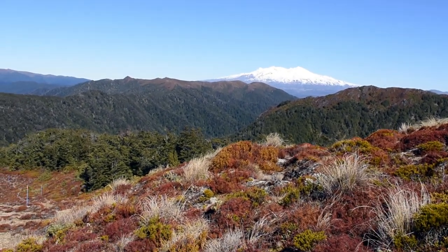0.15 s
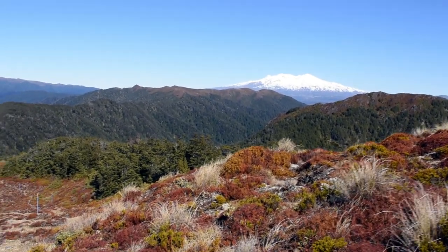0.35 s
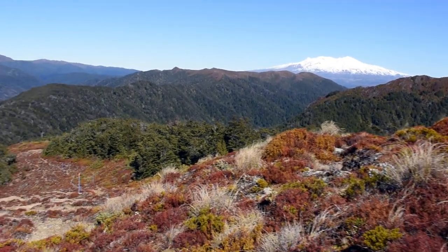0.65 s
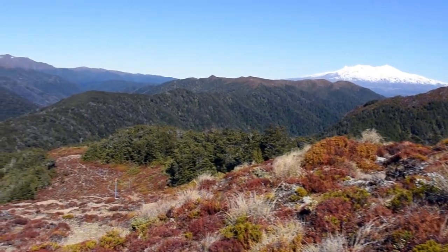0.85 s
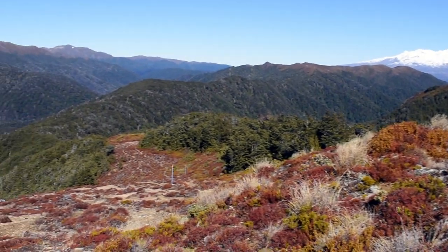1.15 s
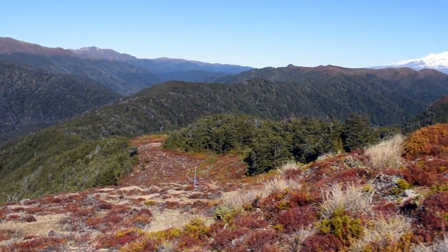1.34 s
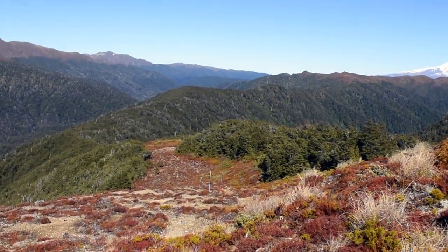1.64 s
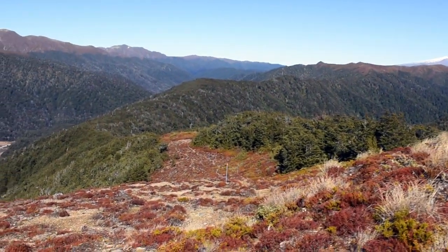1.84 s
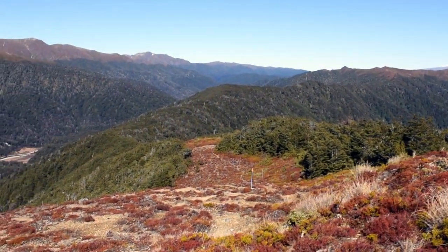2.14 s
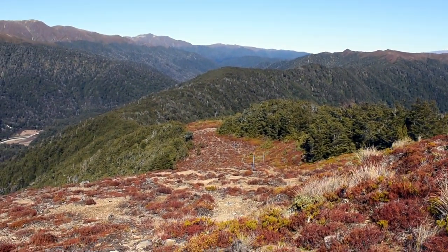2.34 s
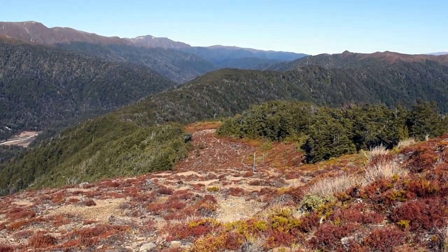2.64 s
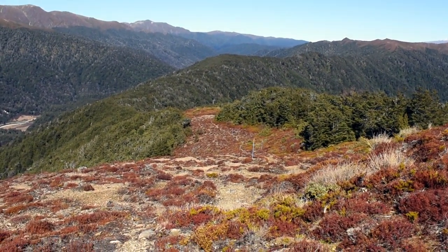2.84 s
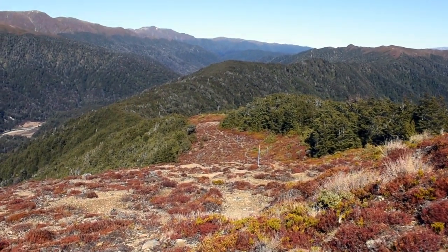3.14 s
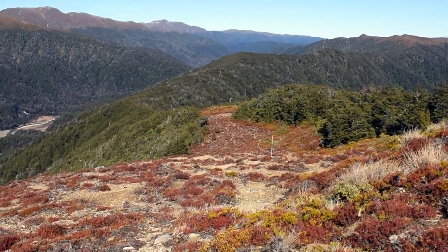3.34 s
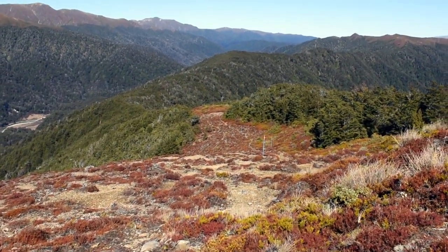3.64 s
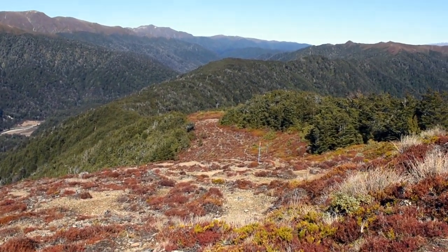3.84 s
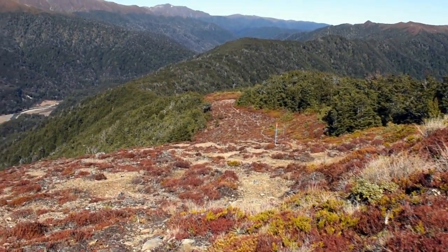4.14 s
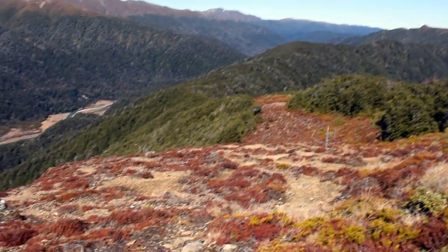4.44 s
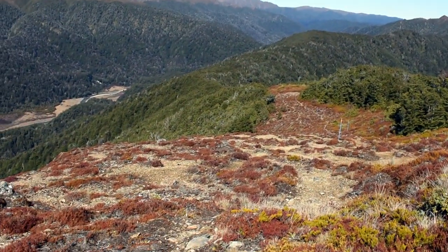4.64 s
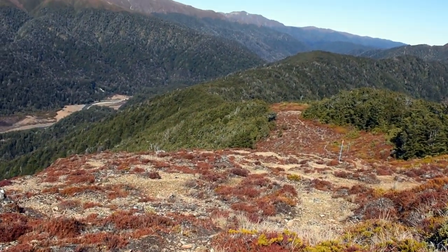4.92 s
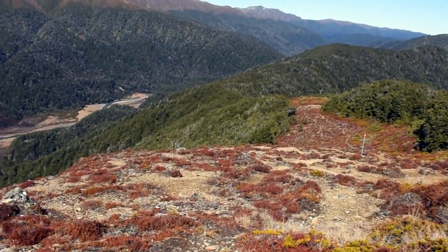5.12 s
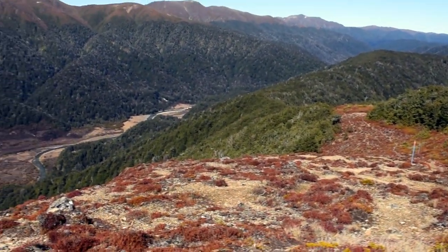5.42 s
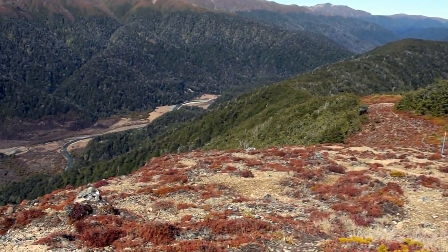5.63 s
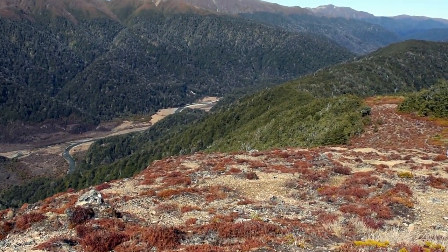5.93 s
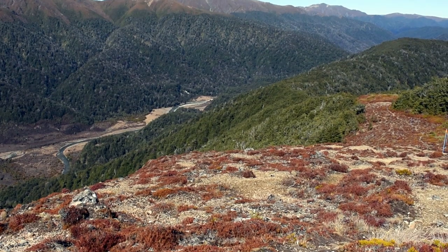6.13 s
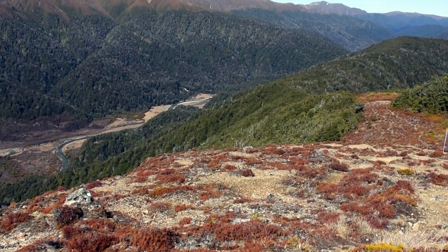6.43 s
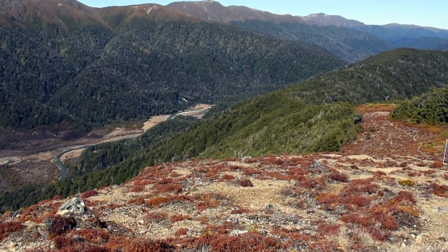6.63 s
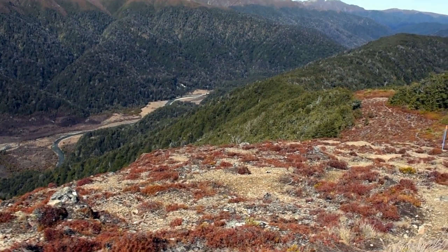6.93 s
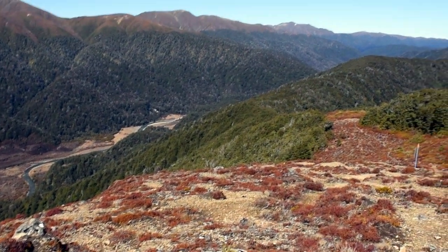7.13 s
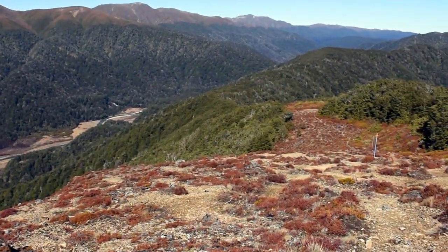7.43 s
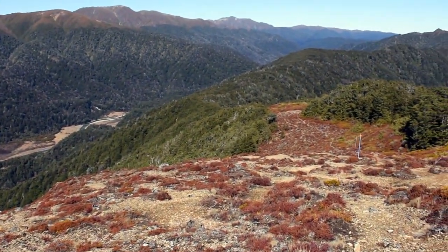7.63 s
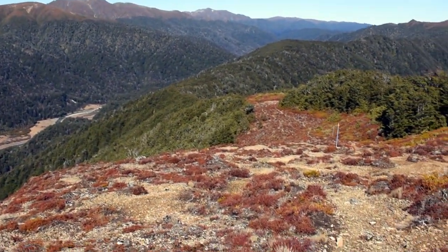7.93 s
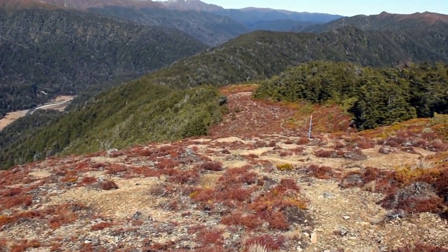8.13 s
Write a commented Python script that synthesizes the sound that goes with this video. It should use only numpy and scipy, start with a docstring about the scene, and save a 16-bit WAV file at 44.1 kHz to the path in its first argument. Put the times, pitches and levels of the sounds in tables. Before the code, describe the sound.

Close footsteps crunch over gravel at a walking pace, a little uneven, with small stones clicking and grit trickling between treads. The place is outdoors and dry in sound, with only a faint rush of open air behind. Light wind rumbles on the microphone now and then. Toward the end a boot scrapes a stone, and the wind buffets the microphone with a burst of low thumps.

```python
"""Boots crunch along a gravel track below a hand-held camera. Under each tread the bed gives, stones knock and
grit fizzes: dense damped sines plus noise, swelling with the load. Pebbles clack sharply, crowded within the
treads and scattered between them, and one flat stone rings as it is scraped. Wind buffets and thumps on the
microphone over a faint rush of open air; no walls."""
import sys
import numpy as np
from scipy import signal
from scipy.fft import rfft, irfft, next_fast_len
from scipy.io import wavfile
from scipy.ndimage import uniform_filter1d, map_coordinates

SR = 44100
rng = np.random.default_rng(int(sys.argv[2]) if len(sys.argv) > 2 else 0)


def store_wav(level_fs):
    """Save 16-bit WAV to argv[1]."""
    pcm = np.round(np.clip(np.atleast_2d(level_fs), -1, 1) * 32767)
    wavfile.write(sys.argv[1], SR, pcm.T.astype(np.int16))


N = 364707
CONTROL_S = .001  # time step of the level curves
LAND_S = .01  # onset of a boot's load


def amp(db):
    return 10 ** (np.asarray(db) / 20)


def unit_rms(x):
    return x / np.sqrt(np.mean(x ** 2) + 1e-20)


def sample_db(power):
    """Power given every CONTROL_S to dB at every sample."""
    return np.interp(np.arange(N) / SR, np.arange(len(power)) * CONTROL_S, 10 * np.log10(power))


def wobble(rate_hz):
    """Smooth random curve, rate_hz knots a second."""
    knots = rng.standard_normal(int(N * rate_hz / SR) + 4)
    return map_coordinates(knots, [np.arange(N) * rate_hz / SR])


def coloured(x, points):
    """Minimum-phase filter through (Hz, dB) points."""
    size = 8192
    hz, db = np.transpose(points)
    gain_db = np.interp(np.log(np.fft.rfftfreq(size, 1 / SR) + 1), np.log(hz), db)
    cepstrum = irfft(np.log(amp(gain_db)), size)
    cepstrum[1:size // 2] *= 2
    cepstrum[size // 2 + 1:] = 0
    impulse = irfft(np.exp(rfft(cepstrum)), size)[:size // 2]
    return signal.oaconvolve(x, impulse)[:N]


def place(starts_s, sounds):
    """Sum short sounds, one a row, at their starts."""
    at = np.clip(np.round(starts_s * SR).astype(int), 0, N)[:, None] + np.arange(sounds.shape[1])
    return np.bincount(at.ravel(), sounds.ravel(), N + sounds.shape[1])[:N]


def grains(count, hz, octaves, decay_cycles, cap_db, samples, spread_db=2.5):
    """Random damped sines within +-octaves of hz, a few louder than the rest."""
    when, pitch, luck, sign = rng.random((count, 4)).T
    cycles = (hz * 2 ** (octaves * (2 * pitch - 1)))[:, None] * np.arange(samples) / SR
    strength = amp(np.minimum(-spread_db * np.log(1 - luck), cap_db)) * np.sign(sign - .5)
    rings = strength[:, None] * np.exp(-cycles / decay_cycles) * np.sin(2 * np.pi * cycles)
    return unit_rms(place(when * N / SR, rings))


def air():
    """Faint steady rush of open air and microphone hiss."""
    # Air spectrum. Each row: frequency in Hz, gain in dB.
    spectrum = [(20, -12), (80, -16), (200, -16.5), (550, -1.5), (1300, -5.5), (2000, -8), (8000, -18),
                (12000, -22), (16000, -23)]
    return amp(-61 + 0.5 * wobble(2.92)) * unit_rms(coloured(rng.standard_normal(N), spectrum))


def buffeting(heel_db):
    """Lumpy rumble: gusts hit the microphone port and treads shake the camera."""
    # Gusts. Each row: peak time in seconds, level in dB, seconds to rise 10 dB, seconds to fall 10 dB.
    gusts = [(0.08, -51, .12, .06), (0.3, -52, .05, .1), (0.53, -53, .1, .09), (0.78, -50, .03, .07),
             (0.94, -45, .05, .04), (1.58, -62, .1, .03), (2.17, -57, .15, .04), (2.85, -54, .02, .06),
             (3.92, -52, .18, .03), (4.03, -56, .04, .03), (4.16, -47, .04, .12), (4.37, -56, .1, .03),
             (5.02, -61, .06, .05), (6.5, -57, .015, .1), (6.7, -53, .15, .14), (7.07, -56, .06, .04),
             (7.29, -52, .12, .05), (7.52, -47, .025, .2), (7.71, -35, .15, .17), (7.95, -46, .04, .03),
             (8.06, -44, .05, .08), (8.27, -48, .08, .1)]
    # Rumble spectrum. Each row: frequency in Hz, gain in dB.
    spectrum = [(15, -65), (30, -26), (80, -8), (160, -5.5), (300, -8.5), (500, -18), (950, -36.5),
                (1600, -76)]
    calm_db, jolt_re_heel_db = -80, -21
    t = np.arange(0, N / SR, CONTROL_S)
    power = amp(calm_db) ** 2
    for peak_s, db, rise_s, fall_s in gusts:
        drop_db = 10 * np.where(t < peak_s, (peak_s - t) / rise_s, (t - peak_s) / fall_s)
        power += amp(db - drop_db) ** 2
    strength = np.hypot(amp(sample_db(power)), amp(heel_db + jolt_re_heel_db))
    lumps = amp(3.5 * wobble(45))
    return strength * unit_rms(coloured(lumps * rng.standard_normal(N), spectrum))


def eddies():
    """Single wind eddies push the microphone membrane for a cycle or two."""
    # Eddies at the port. Each row: centre time in seconds, level in dB, frequency in Hz.
    puffs = [(0.053, -35.5, 150), (0.07, -34, 160), (0.083, -34.5, 110), (0.781, -35, 129),
             (3.933, -34, 120), (4.143, -29, 157), (4.177, -31, 218), (4.187, -37, 246),
             (6.523, -37.5, 129), (7.499, -31, 130), (7.51, -31.5, 149), (7.524, -24.5, 161),
             (7.546, -26, 160), (7.558, -19, 164), (7.574, -23.5, 263), (7.608, -17, 283),
             (7.652, -17, 286), (7.722, -16, 169), (7.736, -15.5, 290), (7.757, -20, 190),
             (7.786, -21, 190), (7.816, -20, 170), (7.88, -24.5, 310), (7.896, -29, 140),
             (7.919, -25.5, 164), (8.014, -19.5, 265), (8.048, -32, 119), (8.07, -31, 220),
             (8.082, -37, 150), (8.096, -47, 193)]
    centre_s, db, hz = np.array(puffs, float).T[..., None]
    t = np.arange(-1024, 1024) / SR
    phase = 2 * np.pi * (hz * t + rng.random((len(puffs), 1)))
    push = 0.57 * np.exp(-(t * hz / 0.73) ** 2) * np.cos(phase)
    steep_edge = 0.17 * np.exp(-(t * hz / 0.35) ** 2) * np.cos(2.18 * phase)
    return place(centre_s[:, 0] + t[0], amp(db) * (push + steep_edge))


def slab(mode_hz=1820, decay_s=0.0052):
    """Scraping noise rings one narrow mode of a flat stone."""
    # The scrape: start in seconds, length in seconds, level in dB, fade in dB per second.
    scrape = (7.165, .115, -39, 40)
    start_s, length_s, top_db, fade_db_per_s = scrape
    end_s = start_s + length_s
    db = np.interp(np.arange(N) / SR, [start_s - LAND_S, start_s + LAND_S, end_s, end_s + .02],
                   [-90, top_db, top_db - fade_db_per_s * length_s, -90])
    t = np.arange(1024) / SR
    mode = np.exp(-t / decay_s) * np.sin(2 * np.pi * mode_hz * t)
    return amp(db + 1.7 * wobble(80)) * unit_rms(signal.oaconvolve(rng.standard_normal(N), mode)[:N])


def small_clacks(stones_db, count=45, over_stones_db=7, base_hz=1150):
    """Random rows for pebbles(), crowded where the stones are loaded."""
    when, pitch, size, bright = rng.random((count, 4)).T
    share = np.cumsum(amp(stones_db))
    at = np.searchsorted(share, when * share[-1]).clip(0, N - 1)
    db = stones_db[at] + over_stones_db + 6 * (size - .5)
    hz = base_hz * 2 ** (2.2 * pitch ** 3 - 0.3)
    return np.transpose([at / SR, db, hz, -14 + 12 * bright])


def pebbles(stones_db):
    """A pebble snaps, rings a few cycles, cracks brightly and rattles faintly on the ground."""
    # Clacks. Each row: time in seconds, level in dB, ring in Hz, relative crack level in dB.
    clacks = [(0.1088, -28.5, 1200, -10), (0.1615, -20, 1320, -25), (0.162, -25, 2900, -12),
              (0.1726, -29, 1250, -9), (0.2883, -25.5, 2100, -1), (0.3048, -26, 1340, -21),
              (0.3163, -26, 1110, -10), (0.3359, -23, 834, -8), (0.7954, -31, 4630, 3),
              (0.8883, -27.5, 1340, -10), (0.907, -28, 960, -9), (0.9315, -21, 1180, -15),
              (0.9554, -18, 1170, -15), (0.9696, -22.5, 1180, -13), (0.9913, -32, 1120, -10),
              (1.0154, -34, 1140, -15), (1.2404, -28, 1240, -20), (1.2784, -33.5, 10000, -8),
              (1.3463, -38, 1310, -3), (1.429, -27, 2370, -9), (1.4726, -28, 2910, -12),
              (1.4773, -27, 3900, -11), (1.4812, -25, 2450, -12), (1.4916, -23, 1080, -16),
              (1.4959, -25, 1120, -14), (1.5127, -25, 1000, -10), (1.5673, -27, 1020, -11),
              (1.584, -21, 1130, -16), (1.619, -27, 1210, -17), (1.6813, -35, 2500, 2),
              (1.769, -34.5, 690, -19), (1.822, -32.5, 1760, -6), (1.8555, -36, 4610, -15),
              (2.0537, -21, 700, -9), (2.1427, -22.5, 955, -2), (2.3242, -32.5, 850, -18),
              (2.366, -35, 8260, -6), (2.4244, -42, 8390, -2), (2.623, -25, 1320, -9),
              (2.6324, -28, 1040, -11), (2.6423, -27, 1100, -9), (2.7156, -28, 1140, -11),
              (3.0517, -31, 1800, -20), (3.37, -34, 600, -20), (3.2348, -19.5, 1060, -4),
              (3.3404, -22, 1070, -18), (3.3915, -32, 1100, -14), (3.4084, -21.5, 3680, -13),
              (3.4114, -29.5, 1680, -12), (3.413, -27, 6100, -4), (3.511, -32.5, 2150, -11),
              (3.5266, -33, 4410, -19), (3.5412, -13.5, 5400, -25), (3.5447, -21.5, 1700, -13),
              (3.5496, -30, 1720, -11), (3.5688, -22, 4670, -18), (3.6452, -32, 6170, -6),
              (3.6633, -20, 2220, -1), (3.666, -33, 2880, -7), (3.7023, -39, 1270, -14),
              (3.7438, -28, 7010, -7), (3.7679, -28, 960, -9), (3.7894, -29, 870, -10),
              (3.832, -27, 1060, -3), (3.9592, -32, 3540, -10), (3.6747, -21.5, 3080, -18),
              (3.7333, -18, 4700, -18), (3.7413, -11.5, 6300, -16), (3.7581, -22.5, 2780, 1),
              (3.8033, -21, 940, -15), (3.8198, -23, 5680, -13), (3.866, -28.5, 1010, -11),
              (3.9545, -20, 3580, -22), (3.9663, -27.5, 2140, 4.5), (4.0278, -33, 3660, -14),
              (4.0406, -34.5, 1010, -2), (4.0583, -35, 1070, -9), (4.1273, -29.5, 2970, -5),
              (4.13, -36, 2300, -12), (4.154, -40, 1790, -15), (4.2978, -32, 3480, -10),
              (4.3576, -29, 750, -7), (4.3525, -16.5, 690, -16), (4.3535, -24, 5500, -8),
              (4.369, -25, 1000, -3), (4.4043, -29, 1030, -12), (4.829, -25, 4060, -12),
              (4.8549, -20.5, 5850, -14), (4.8577, -29, 2970, -12), (5.1461, -38, 1240, -18),
              (5.2827, -37, 1010, -13), (5.377, -32, 700, -15), (5.4133, -28, 7470, -1),
              (5.4157, -29, 7400, -2), (5.486, -31, 3670, -2), (5.4349, -27.5, 810, -13),
              (5.5181, -21, 1200, -16), (5.5528, -19, 9560, -20), (5.64, -35, 2510, -4),
              (5.6804, -39, 2590, 5), (5.6929, -33.5, 3510, 4), (5.7297, -24.5, 3030, -18),
              (5.7566, -26, 3100, 5), (5.7598, -26, 2470, 0), (5.8334, -28, 8400, 3),
              (5.841, -31, 4700, -10), (5.9093, -12.5, 2870, -23), (5.9135, -19, 2900, -1),
              (5.9854, -24, 1000, -13), (6.0089, -30, 1020, -20), (6.027, -12, 7000, 0),
              (6.0313, -17.5, 3430, -12), (5.9158, -32, 2360, -8), (6.0819, -29, 6840, 1),
              (6.1056, -26, 2390, -8), (6.099, -25, 1150, -8), (6.1036, -18, 980, -8),
              (6.119, -20, 770, -8), (6.294, -36, 1000, 0), (6.5068, -39.5, 5680, -7),
              (7.1647, -19.5, 2320, 5), (7.1675, -16, 3000, -12), (7.171, -22, 1870, -11),
              (7.1781, -14, 1780, -22), (7.187, -23, 1820, -14), (7.2233, -27.5, 2840, -1),
              (7.2634, -27, 4900, -9), (7.313, -22.5, 1130, -15), (7.4358, -29.5, 1070, -18),
              (7.7854, -29, 1720, -10), (7.789, -28, 1810, -3), (8.0761, -28, 1230, -22)]
    # Clack colour from above. Each row: frequency in Hz, gain in dB.
    spectrum = [(40, -49), (400, -4.5), (900, -0.5), (9000, 3.5), (11000, -11.5), (13000, -17),
                (16000, -24)]
    at_s, db, hz, crack_db = np.vstack([clacks, small_clacks(stones_db)]).T[..., None]
    t = np.arange(768) / SR
    noise = rng.standard_normal((len(at_s), 2, len(t)))
    snap_hz = np.sqrt(2600 * hz)  # hard contact is short even on big stones
    snap_gain = 0.61 * np.minimum(hz / 1800, 1)  # softer on big dull stones
    snap = snap_gain * np.exp(-t * snap_hz / 0.44) * np.sin(2 * np.pi * snap_hz * t)
    decay_s = 0.0015 * (hz / 1000) ** -.6  # small stones ring higher and shorter
    ring = 1.17 * (1 - np.exp(-t * hz / 0.4)) * np.exp(-t / decay_s) * np.sin(2 * np.pi * hz * t)
    ratio = 1.2 + 0.77 * rng.random(hz.shape)
    partner_hz = np.where(hz < 3200, hz * ratio, hz / ratio)  # the other stone of the pair
    partner = 0.33 * np.exp(-t / 0.0015) * np.sin(2 * np.pi * partner_hz * t)
    bright_noise = np.diff(uniform_filter1d(noise[:, 0], size=2), prepend=0)
    crack = 0.72 * amp(crack_db) * np.exp(-t / 0.0011) * bright_noise
    rattle = 0.13 * np.exp(-t / 0.0032) * uniform_filter1d(noise[:, 1], size=3)
    sounds = amp(db) * (snap + ring + partner + crack + rattle)
    return coloured(place(at_s[:, 0] - .5 / hz[:, 0], sounds), spectrum)


def tread_levels():
    """Heel, stones and grit levels in dB: a boot lands, presses, lifts off; the gravel trickles on."""
    # Treads. Each row: landing in seconds, delay to crest and length in seconds, grit at crest in dB,
    # landing and lift-off in dB under the crest, heel and stones in dB over the grit.
    treads = [(0.0, .165, .19, -52, 6, 2, -8, 4), (0.22, .11, .2, -38.5, 8, 9, -4, 3),
              (0.74, .21, .24, -39, 19, 5, -6, 7.5), (1.1, .17, .29, -56, 5, 4, -10, 1),
              (1.407, .083, .125, -39, 6, 6, -6, 6), (1.535, .045, .08, -42, 4, 3, -4, 6),
              (1.8, .04, .1, -56, 2, 4, -8, -1), (2.024, .075, .165, -37.5, 3, 8, -3, 3.5),
              (2.53, .065, .21, -38, 13, 4, -5, 3), (2.98, .07, .18, -54, 5, 2, -6, 3),
              (3.16, .075, .19, -40, 5, 11, -3, 5), (3.52, .022, .033, -49, 7, 6, 1, 4),
              (3.728, .06, .137, -39, 4, 6, -7, 0), (4.02, .025, .05, -56, 4, 5, -2, -4),
              (4.289, .069, .089, -34, 11, 9, -2, -1), (4.38, .01, .115, -47, 1, 9, -4, -2),
              (4.82, .018, .135, -41, 1, 5, -4, 3), (5.402, .014, .04, -40, 0, 6, 1, -1),
              (5.46, .09, .13, -45, 3, 1, -2, -2), (5.824, .012, .022, -41.5, 4, 5, -20, -13),
              (5.976, .012, .074, -44, 0, 4, 0, 0), (6.045, .06, .087, -34.5, 10, 6, -6, 0),
              (6.553, .035, .065, -41, 2, 4, -4, 0), (6.63, .04, .118, -51, 2, 3, -3, -2),
              (7.162, .012, .113, -41, 1, 4, -10, 1), (7.28, .04, .065, -53, 1, 3, -1, 4),
              (7.71, .04, .14, -44.5, 4, 4, 1, 1)]
    # Loose gravel between steps. Each row: time in seconds, grit in dB, stones in dB.
    rustle = [(0.0, -64, -51), (0.2, -59, -57), (0.6, -64, -59), (1.3, -61, -66), (1.7, -60, -66),
              (1.95, -61, -58), (2.45, -58, -59), (2.85, -65, -70), (3.55, -60, -58), (3.95, -57, -66),
              (4.62, -65, -70), (4.9, -61, -59), (5.25, -60, -57), (5.6, -59, -65), (5.75, -58, -61),
              (5.9, -64, -67), (6.25, -65, -60), (6.7, -61, -65), (8.27, -61, -63)]
    # Trickle of heel, stones and grit, in dB relative to lift-off.
    settle_db = [-14, -15, -9]
    lift_db_per_s, settle_db_per_s, ease_db_per_s = 700, 90, 22
    heel_floor_db, strike_db, strike_s = -66, 3, .015
    clock = np.arange(0, N / SR, CONTROL_S)
    at_s, loose_grit_db, loose_stones_db = np.transpose(rustle)
    power = amp([np.full_like(clock, heel_floor_db), np.interp(clock, at_s, loose_stones_db),
                 np.interp(clock, at_s, loose_grit_db)]) ** 2
    for start_s, crest_s, length_s, db, land_db, lift_db, heel_db, stones_db in treads:
        t = np.maximum(clock - start_s, 0)
        onset = np.minimum(t / LAND_S, 1)
        press_db = np.interp(t, [0, crest_s, max(length_s, crest_s + LAND_S)], [-land_db, 0, -lift_db])
        lifted_s = np.maximum(t - length_s, 0)
        fade_db = np.maximum(-lift_db_per_s * lifted_s, np.c_[settle_db] - settle_db_per_s * lifted_s)
        # The heel strikes before the sole rolls, then unloads.
        roll_db = strike_db * np.exp(-t / strike_s) - ease_db_per_s * (t - crest_s)
        layers_db = [heel_db + roll_db, np.full_like(t, stones_db), np.zeros_like(t)]
        power += (amp(db + press_db + fade_db + layers_db) * onset) ** 2
    return [sample_db(layer) for layer in power]


def heel():
    """The bed gives under the heel in low, dull pushes."""
    # Heel spectrum. Each row: frequency in Hz, gain in dB.
    spectrum = [(60, -45.5), (150, -23), (300, -8.5), (480, -2), (700, -0.5), (1200, -29)]
    pushes = grains(count=1500, hz=395, octaves=0.79, decay_cycles=0.74, cap_db=15, samples=384)
    return unit_rms(coloured(pushes + 0.84 * rng.standard_normal(N), spectrum))


def stones():
    """Stones slip and knock under the sole; the gaps between them ring by varying amounts."""
    # Stone spectrum with the gap resonance. Each row: frequency in Hz, gain in dB.
    spectrum = [(120, -46), (400, -13.5), (750, -8), (950, -3.5), (1100, 2), (1300, -2), (1550, -5.5),
                (2000, -5), (3000, -11.5), (6000, -71)]
    knocks = grains(count=5000, hz=1193, octaves=0.89, decay_cycles=1.4, cap_db=9, samples=256)
    hollow = np.clip(0.55 + 0.38 * wobble(4), 0, 1)
    bed = knocks + 1.1 * rng.standard_normal(N)
    ringing = coloured(hollow * bed, spectrum)
    plain = coloured((1 - hollow) * bed, spectrum[:3] + spectrum[-3:])
    return unit_rms(ringing + .5 * plain)


def grit():
    """Fine grit fizzes in tiny high ticks."""
    # Grit spectrum. Each row: frequency in Hz, gain in dB.
    spectrum = [(600, -20.5), (1800, -4), (3600, -2), (5700, -2.5), (6600, -4), (7400, 1), (9000, -1.5),
                (10700, -4), (13000, -16.5), (16000, -22)]
    ticks = grains(count=16000, hz=5500, octaves=1.4, decay_cycles=3.5, cap_db=8, samples=96)
    return unit_rms(coloured(ticks + 1.19 * rng.standard_normal(N), spectrum))


def boots(heel_db, stones_db, grit_db):
    """The sole rolls unevenly, so all sizes of gravel swell together."""
    roll = wobble(60)
    return (amp(heel_db + 0.75 * roll) * heel()
            + amp(stones_db + 0.73 * roll) * stones()
            + amp(grit_db + 1.95 * roll) * grit())


def scene():
    heel_db, stones_db, grit_db = tread_levels()
    gravel = boots(heel_db, stones_db, grit_db) + slab() + pebbles(stones_db)
    wind = buffeting(heel_db) + eddies()
    return (gravel + wind + air())[None]


def record(dry, top_hz=15750):
    """The camera keeps nothing above its band limit."""
    size = next_fast_len(N + 4096)
    passband = np.fft.rfftfreq(size, 1 / SR) < top_hz
    return irfft(rfft(dry, size) * passband, size)[:, :N]


dry = scene()
out = record(dry)
store_wav(out)
```